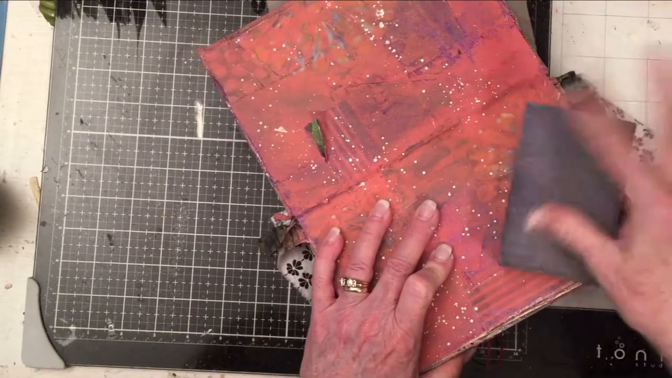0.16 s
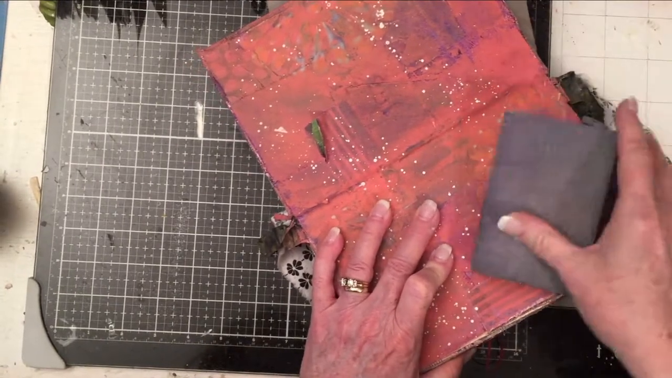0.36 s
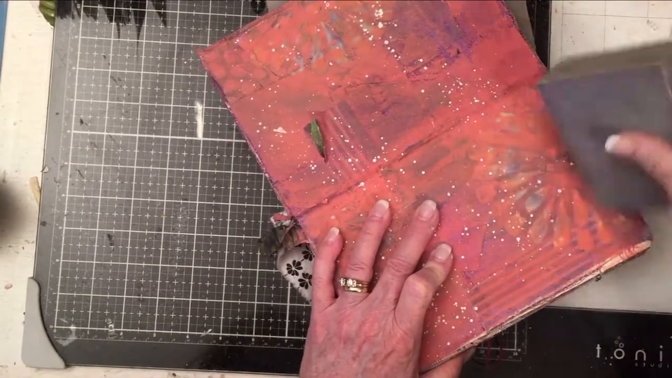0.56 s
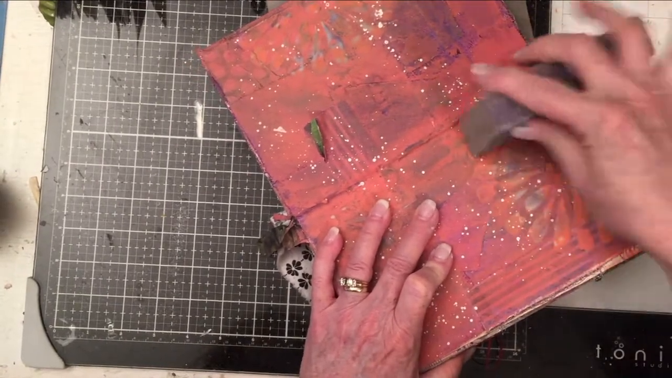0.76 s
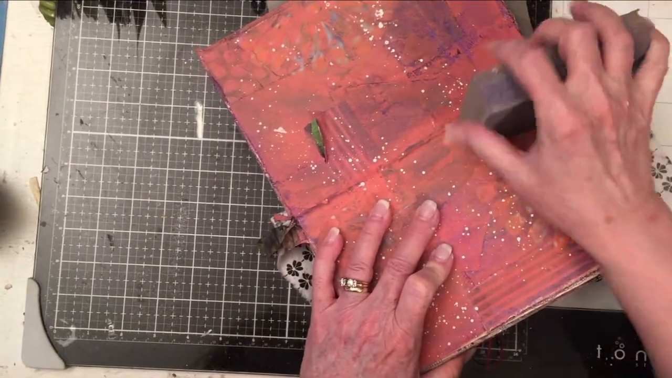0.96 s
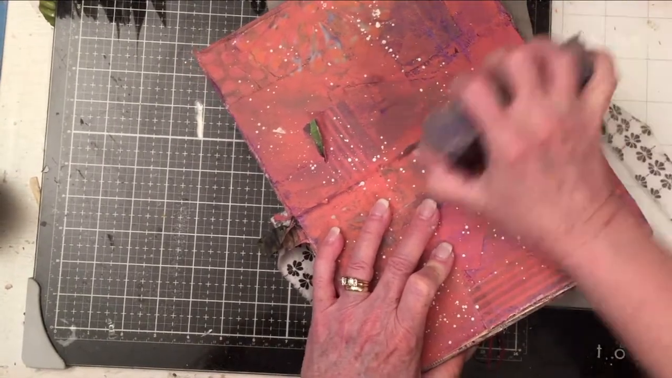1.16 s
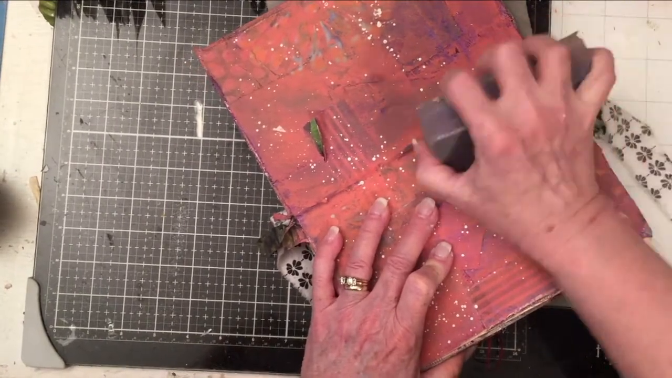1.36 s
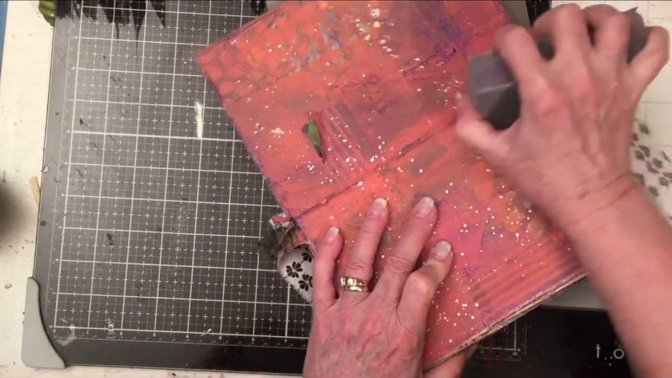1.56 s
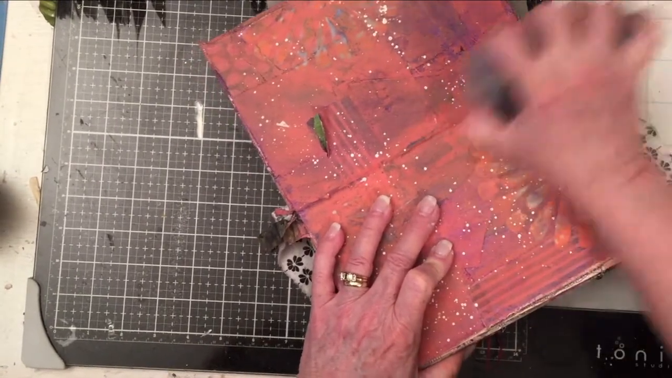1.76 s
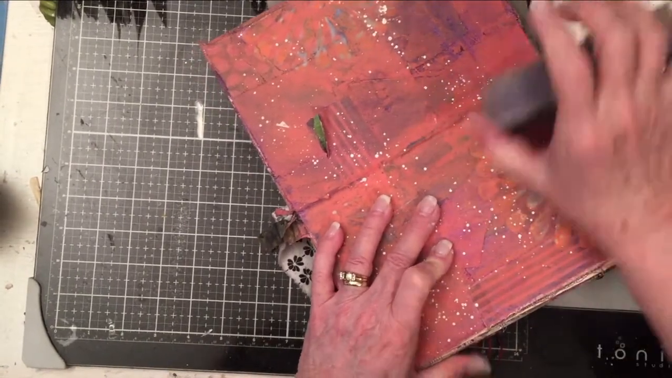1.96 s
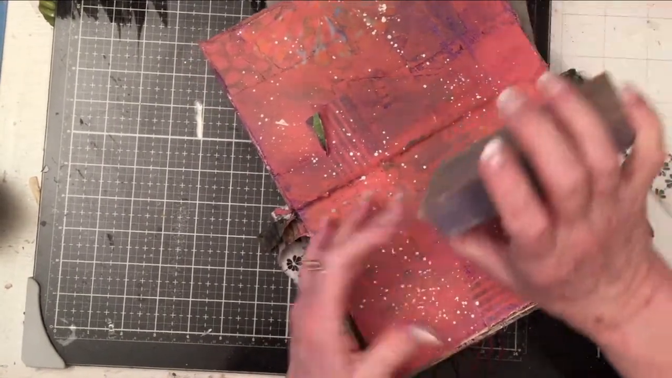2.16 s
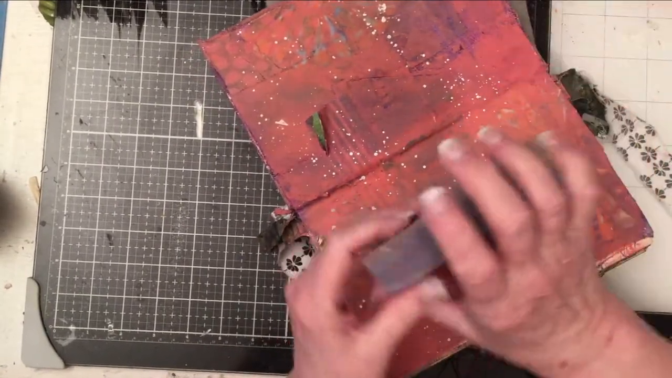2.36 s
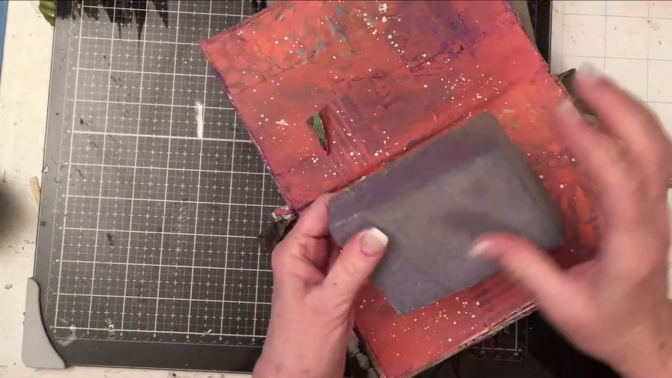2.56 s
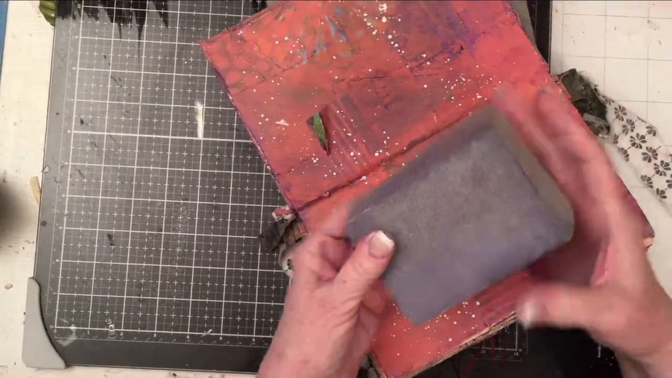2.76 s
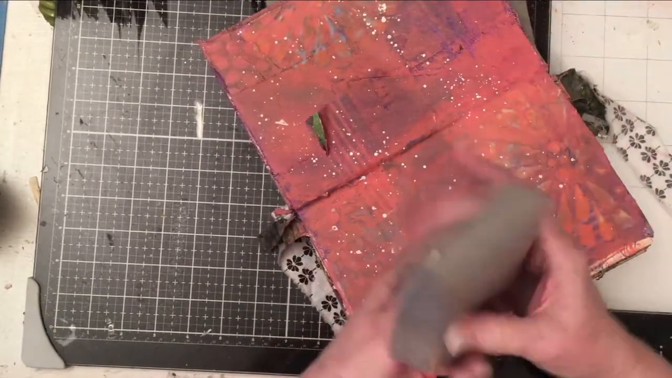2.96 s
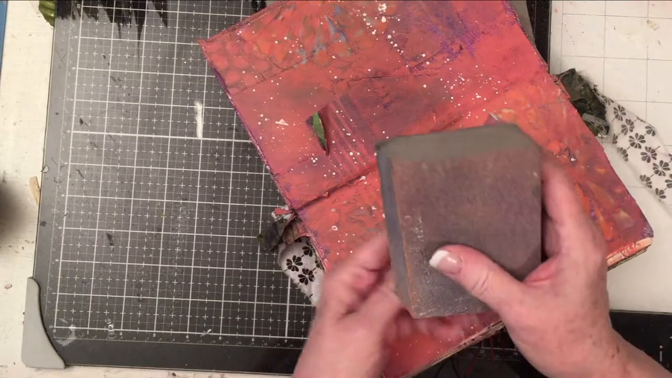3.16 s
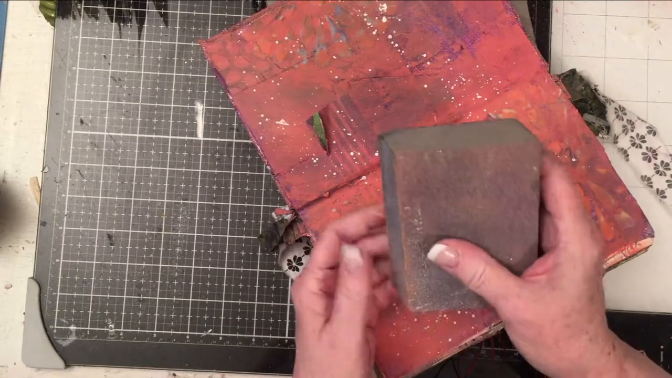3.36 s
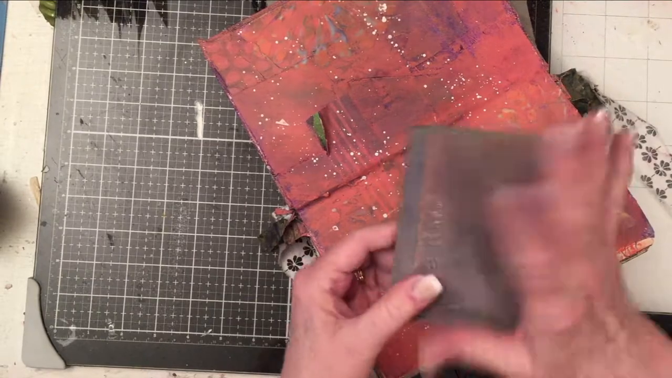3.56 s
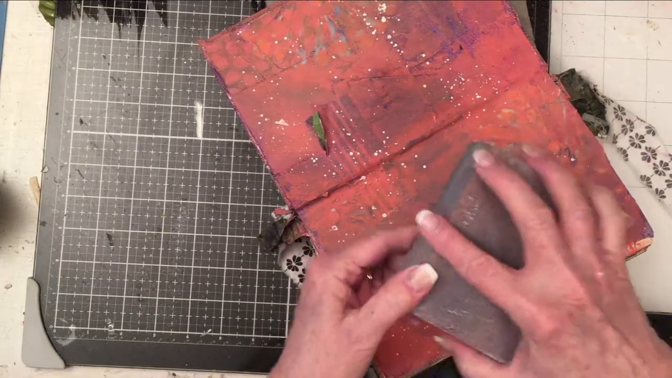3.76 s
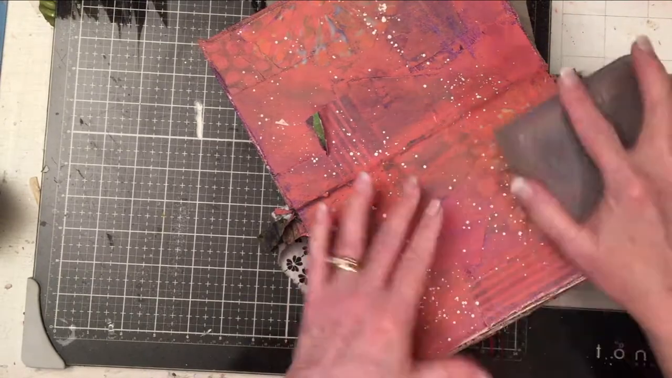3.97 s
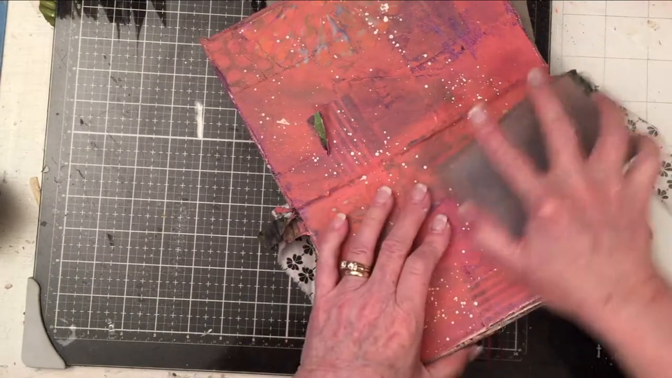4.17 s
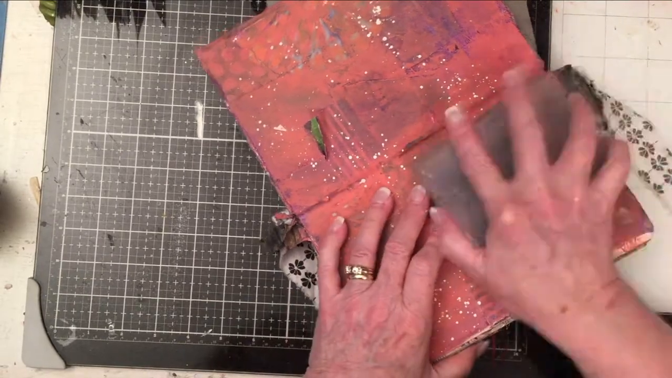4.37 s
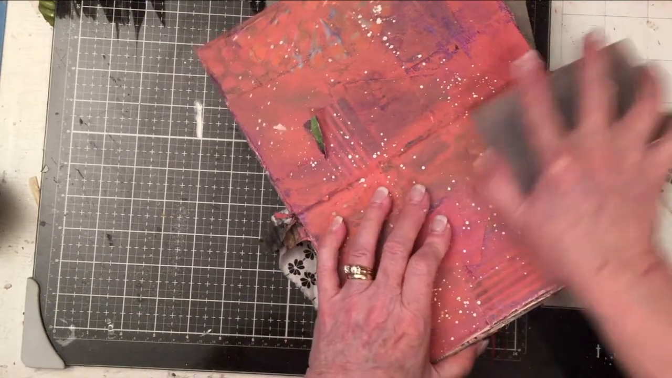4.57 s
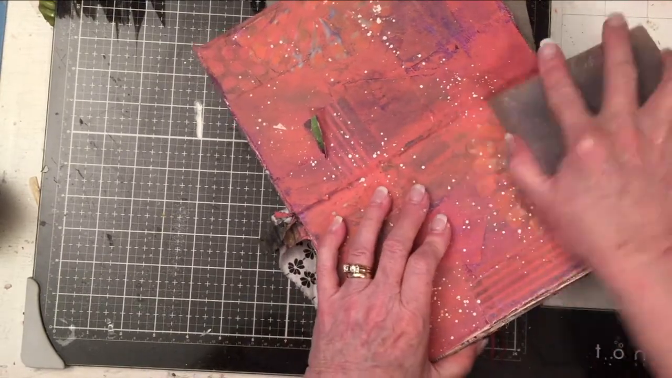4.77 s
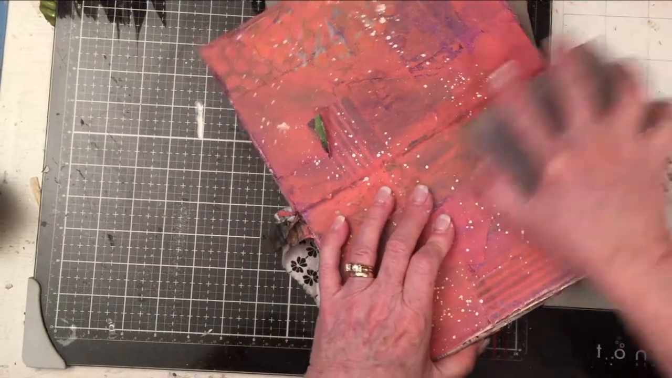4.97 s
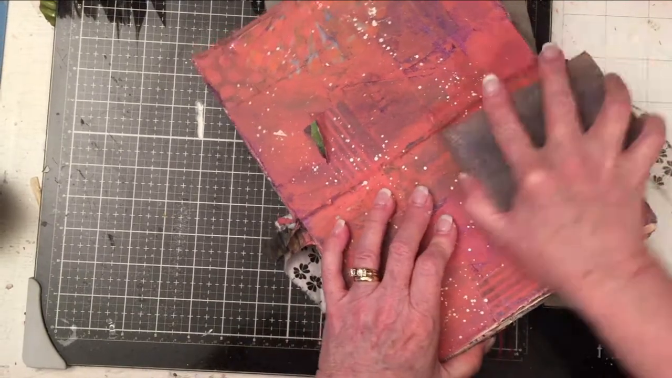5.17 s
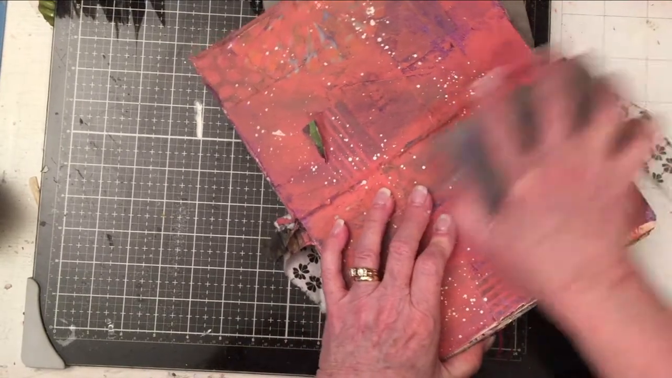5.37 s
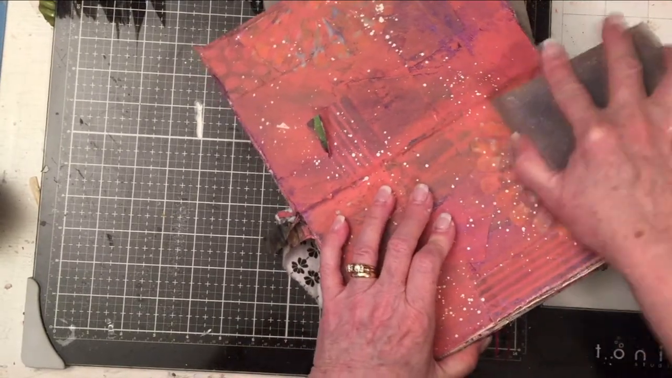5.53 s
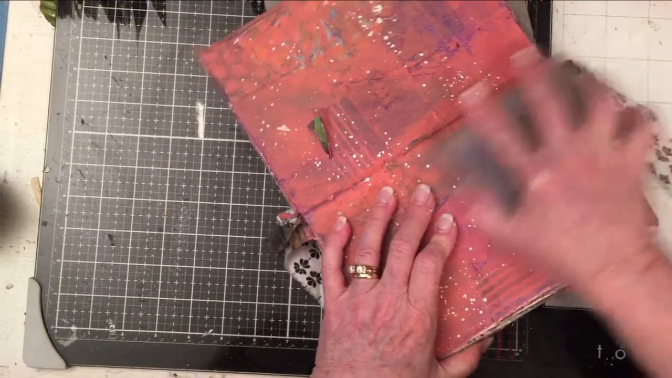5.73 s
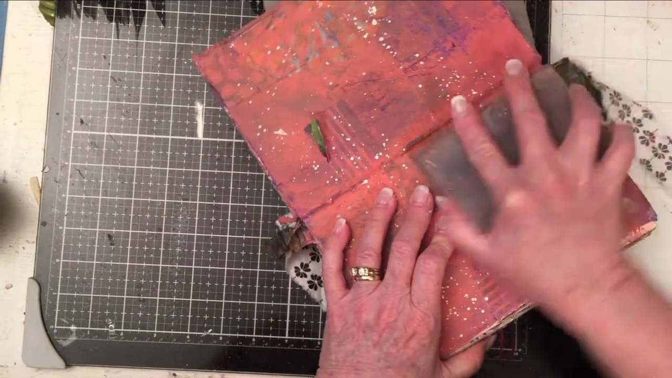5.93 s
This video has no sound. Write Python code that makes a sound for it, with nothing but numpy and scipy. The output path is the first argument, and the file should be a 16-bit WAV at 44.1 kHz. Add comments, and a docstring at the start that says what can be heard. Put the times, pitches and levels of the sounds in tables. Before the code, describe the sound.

Close, dry recording in a small room. A sanding block drags briefly on a painted book page, is handled with taps, then its edge makes short scuffs and harder uneven rasping strokes. After a softer pause of skin brushing on grit and faint knocks, it lands again and scrubs rapidly back and forth until the end, over a low table rumble.

```python
"""On a craft table in a small room, close to one microphone, a sanding block rubs a painted book page.
It is dragged aside; its edge scuffs four times and makes seven strokes; fingers turn it over; then its
flat face scrubs about eight strokes a second. Random snaps of grit, filtered by resonances, form each rub;
irregular trips drum on the page. Decaying modes and noise make the taps; narrow noise makes the table rumble."""
import sys
import numpy as np
from scipy import signal
from scipy.fft import rfft, irfft, next_fast_len
from scipy.io import wavfile
from scipy.ndimage import uniform_filter1d, map_coordinates

SR = 44100
rng = np.random.default_rng(int(sys.argv[2]) if len(sys.argv) > 2 else 0)


def wrap_up_sound(samples):
    """Save the sound to the file named by the first command line argument, as 16-bit audio."""
    columns = np.atleast_2d(samples).T
    # keep every value between -1 and 1, then stretch to whole-number steps
    tamed = np.clip(columns, -1, 1)
    steps = np.round(tamed * 32767).astype(np.int16)
    wavfile.write(sys.argv[1], SR, steps)


N = 264600
TIME = np.arange(N) / SR  # s


def amp(db):
    """Logarithmic level: decibels become an amplitude gain."""
    return 10 ** (np.asarray(db) / 20)


def unit(x):
    """Normalisation: scale a signal to rms 1."""
    return x / np.sqrt(np.mean(x ** 2) + 1e-20)


def along(points, hz):
    """Logarithmic frequency scale: interpolate (f/Hz, value) points along it."""
    f, value = np.transpose(points)
    return np.interp(np.log(hz + 1), np.log(f + 1), value)


def filtered(x, response):
    """Linear filtering: multiply the spectrum by a response of frequency."""
    size = next_fast_len(len(x) + 8192)
    hz = np.fft.rfftfreq(size, 1 / SR)
    return irfft(rfft(x, size) * response(hz), size)[:len(x)]


def below(hz, edge_hz, order=4):
    """Butterworth low-pass: gain falls smoothly above the edge."""
    return 1 / np.sqrt(1 + (hz / edge_hz) ** (2 * order))


def above(hz, edge_hz, order=4):
    """Power complement: the high-pass gain that completes the low-pass."""
    return (hz / edge_hz) ** order * below(hz, edge_hz, order=order)


def resonance(hz, centre_hz, width_hz):
    """Damped resonance: the response of one mode."""
    return 1j * hz * width_hz / (centre_hz ** 2 - hz ** 2 + 1j * hz * width_hz)


# resonances (+) and hollows (-) of block, book and table: (f/Hz, width/Hz, level/dB)
BODY_RESONANCES = [(1054, 82, 4), (1270, 90, 0), (1380, 150, 2.5), (1724, 230, 1.5), (2033, 54, -7),
                   (2045, 90, 4.5), (2260, 530, -1.5), (2580, 260, -1.5), (4950, 910, -3.5), (6030, 260, 0),
                   (6910, 430, -1), (7700, 760, -3.5), (9400, 450, -0.5), (10440, 490, -6.5)]


def body(hz):
    """Resonant colouring: fixed peaks and hollows, summed in decibels, shape every rub."""
    level_db = 0
    for centre, width, db in BODY_RESONANCES:
        level_db = level_db + db / (1 + (2 * (hz - centre) / width) ** 2)
    return amp(level_db)


def wobble(rate):
    """Slow random modulation: a smooth curve through rate knots a second."""
    knots = rng.standard_normal(int(N * rate / SR) + 4)
    return map_coordinates(knots, [TIME * rate])


def snaps(rate, spread_db):
    """Stick-slip: grit points catch and let go as uneven random impulses, rate a second."""
    hit = rng.random(N) < rate / SR
    size = rng.standard_normal(N) * amp(spread_db * rng.standard_normal(N))
    return unit(hit * size)


def smooth_noise(shape, bands, frames):
    """Local averaging: a random time-frequency field, smoothed over bands and frames."""
    across = uniform_filter1d(rng.standard_normal(shape), size=bands, axis=0)
    return unit(uniform_filter1d(across, size=frames, axis=1))


def shifting(x, patchy_db, drift_db):
    """Moving contact patch: colour flickers within a stroke and drifts from one to the next."""
    z = signal.stft(x, nperseg=1024)[2]
    flicker = smooth_noise(z.shape, bands=5, frames=3)
    drift = smooth_noise(z.shape, bands=24, frames=12)
    return signal.istft(z * amp(patchy_db * flicker + drift_db * drift))[1][:N]


HISS_PER_PUSH, CHATTER_PER_RASP = 1.115, 0.92  # dB of hiss per dB of push; dB of chatter per dB of rasp


def stroke_gains(strokes, stop_db_per_s, hiss_per_speed):
    """Friction envelope: each stroke bites, swells to its hardest push, eases off and stops.

    Returns gains of rasp, hiss and any chatter."""
    power = 0
    for start, length, hardest, bite_db_per_s, peak_db, swell_db, hiss_db, *chatter_db in strokes:
        t = TIME - start
        peak_place = np.clip(hardest, .01, .99)
        distance = np.interp(t / length, [0, peak_place, 1], [1, 0, 1])  # 0 at the hardest push
        push = -swell_db * distance ** 2
        speed = -bite_db_per_s * np.maximum(-t, 0) - stop_db_per_s * np.maximum(t - length, 0)
        levels = [push + speed, hiss_db + HISS_PER_PUSH * push + hiss_per_speed * speed]
        levels += [db + CHATTER_PER_RASP * (push + speed) for db in chatter_db]
        power = power + amp(np.maximum(peak_db + np.array(levels), -200)) ** 2
    return np.sqrt(power)


def abrasion(colour, rasp, hiss, weight, rate, spread_db, patchy_db, low_hz, split_hz):
    """Abrasive friction: coarse grit rasps through resonances; fine grit hisses once up to speed."""
    grit = shifting(snaps(rate, spread_db), patchy_db, drift_db=1.68)
    tone = lambda hz: amp(along(colour, hz)) * body(hz)
    coarse = unit(filtered(grit, lambda hz: tone(hz) * below(hz, split_hz, order=6) ** 2))
    fine = unit(filtered(grit, lambda hz: tone(hz) * above(hz, split_hz, order=6) ** 2))
    low = filtered(coarse, lambda hz: below(hz, low_hz, order=3) ** 2)
    high = coarse - low
    return rasp * (low * weight + high / weight) + hiss * fine


def chatter(page, rate, lump_db):
    """Impact excitation: the block trips over ridges of paint and drums on the page."""
    trips = snaps(rate, spread_db=1.5) * amp(lump_db * wobble(110))
    return unit(filtered(trips, lambda hz: amp(along(page, hz))))


def pressure(rasp, drum, light_db, effect):
    """Contact loading: a block that chatters more is pressed harder, so its rasp's low half gains."""
    relative_chatter = drum / rasp / amp(light_db)
    return np.clip(relative_chatter, amp(-9), amp(8)) ** effect


# rasp spectrum of the lightly dragged block, before the body resonances: (f/Hz, level/dB per Hz)
DRAG_SPECTRUM = [(350, -51), (600, -21), (928, -11), (1120, -7.5), (1520, -7), (2350, 2), (2920, -6),
                 (3490, 1), (3780, -2), (7900, -10), (15600, -20)]
# the block dragged aside before it is picked up, levels before the trims below: (start t/s, length t/s,
# place of the hardest push 0-1, bite/(dB/s), peak rasp level/dB, swell/dB, hiss level/dB re rasp)
DRAG_STROKES = [(0.0, 0.071, 0.11, 600, -38, 9, -5.5)]


def drag():
    """Light sliding friction: with little weight on it the block gives a thin rasp."""
    rasp, hiss = stroke_gains(DRAG_STROKES, stop_db_per_s=400, hiss_per_speed=1.4)
    return abrasion(DRAG_SPECTRUM, rasp * amp(-0.1), hiss * amp(0.0), weight=0.83, rate=16000,
                    spread_db=0.5, patchy_db=2.0, low_hz=2200, split_hz=4300)


def jolt_gain(jolts, rise_db_per_s, fall_db_per_s):
    """Exponential growth and decay: the strongest of the (t/s, level/dB) jolts rules each moment."""
    levels = [db - np.maximum(rise_db_per_s * (s - TIME), fall_db_per_s * (TIME - s)) for s, db in jolts]
    return amp(np.max(levels, axis=0))


# hands and block bump the table: (t/s, level/dB)
TABLE_BUMPS = [(0.0, -60), (0.09, -63), (0.225, -46), (0.39, -52), (0.505, -49), (0.585, -48),
               (0.65, -47.5), (0.91, -51), (0.985, -58), (2.31, -66), (3.17, -65), (3.63, -59), (4.01, -58),
               (4.08, -58)]
THUD_RISE_DB_PER_S, THUD_FALL_DB_PER_S = 700, 183
# hard edge strokes rock the table on its legs: (t/s, level/dB)
TABLE_ROCKS = [(1.43, -60), (1.57, -49.5), (1.79, -52), (1.86, -50)]
ROCK_RISE_DB_PER_S, ROCK_FALL_DB_PER_S = 280, 132
# each turn of the hand jolts the table: dB re the stroke's tabled peak, s before the stroke
TURN_JOLT_DB, TURN_LEAD_S = -23.5, 0.018
IDLE_THUD_DB = -75.5  # room rumble keeps the board mode faintly astir


def table():
    """Modal excitation: bumps and hand turns stir the lowest board mode; hard strokes rock the legs."""
    board = lambda hz: resonance(hz, 111.3, 16.0) * below(hz, 440) * above(hz, 48)
    legs = lambda hz: resonance(hz, 56, 30) * below(hz, 62) * above(hz, 37)
    thud = unit(filtered(rng.standard_normal(N), board))
    sway = unit(filtered(rng.standard_normal(N), legs))
    turns = []
    for start, _, _, _, peak_db, *_ in [*EDGE_RUBS, *flat_strokes()]:
        turns.append((start - TURN_LEAD_S, peak_db + TURN_JOLT_DB))
    thud_gain = jolt_gain([*TABLE_BUMPS, *turns], THUD_RISE_DB_PER_S, THUD_FALL_DB_PER_S)
    sway_gain = jolt_gain(TABLE_ROCKS, ROCK_RISE_DB_PER_S, ROCK_FALL_DB_PER_S)
    return (thud_gain + amp(IDLE_THUD_DB)) * thud + (sway_gain + amp(-12) * thud_gain) * sway


# relative spectrum of the room's background noise: (f/Hz, level/dB per Hz)
AIR_SPECTRUM = [(20, -30), (35, -37), (54, 2.5), (80, 0.5), (112, 0.5), (141, -15), (190, -15.5), (300, -9),
                (750, -20.5), (1700, -18.5), (3100, -24.5), (8000, -29.5), (15600, -37.5)]
ROOM_AIR_DB = -64.5  # rms before the slow drift


def room_air():
    """Stationary coloured noise: low rumble and faint hiss, drifting slightly in level."""
    drift = amp(.6 * wobble(7))
    noise = filtered(rng.standard_normal(N), lambda hz: amp(along(AIR_SPECTRUM, hz)))
    return amp(ROOM_AIR_DB) * drift * unit(noise)


# spectrum of skin on grit, before the body resonances: (f/Hz, level/dB per Hz)
FINGER_SPECTRUM = [(300, -15.5), (650, -10), (1100, -8), (1700, 0.5), (2700, 2), (3600, -3.5), (4500, -7),
                   (6000, -11), (8000, -15), (10300, -14), (15600, -16.5)]
# fingers sliding on the block, levels before the trims below: (start t/s, length t/s,
# place of the hardest push 0-1, bite/(dB/s), peak rasp level/dB, swell/dB, hiss level/dB re rasp)
FINGER_RUBS = [(0.205, 0.019, 0.7, 500, -48, 5.5, -3.5), (0.25, 0.013, 0.4, 500, -51.5, 7.5, -13),
               (0.79, 0.023, 0.8, 300, -49.5, 4.5, -7), (0.817, 0.058, 0, 1302, -42.5, 5, 1.5),
               (1.116, 0.025, 0.5, 1040, -56.5, 8, 0.5), (2.178, 0.008, 0.4, 1200, -55, 5, 8.5),
               (2.195, 0.092, 0.3, 500, -58.5, 6, -8), (2.503, 0.047, 0.78, 1240, -51, 2.5, 1),
               (2.608, 0.032, 0.66, 720, -58.5, 4, -3), (2.96, 0.033, 0.6, 300, -62, 6, -4),
               (3.01, 0.031, 0.76, 400, -47, 11, -6.5), (3.093, 0.069, 0.36, 310, -47, 6, -9),
               (3.153, 0.041, 0.67, 850, -43.5, 11, 2.5), (3.198, 0.1, 0.08, 770, -51.5, 10, -3.5),
               (3.607, 0.034, 0.2, 700, -46.5, 9.5, -7), (3.71, 0.057, 0, 300, -57, 6.5, -6),
               (3.95, 0.059, 0.68, 156, -46, 14, -10.5), (4.054, 0.044, 0, 300, -49, 9.5, -8.5)]


def finger_slides():
    """Soft-contact friction: skin brushes over the grit as the block is gripped and turned."""
    rasp, hiss = stroke_gains(FINGER_RUBS, stop_db_per_s=333, hiss_per_speed=1.4)
    weight = amp(0.78 * wobble(18))
    brush = abrasion(FINGER_SPECTRUM, rasp * amp(-1.0), hiss * amp(0.0), weight, rate=8000,
                     spread_db=1.0, patchy_db=3.0, low_hz=2180, split_hz=4970)
    flutter = amp(1.3 * wobble(140))
    return brush * flutter


# modes of the book, before random detuning and level scatter: (f/Hz, level/dB re knock, T60 t/s)
KNOCK_MODES = [(224, -1, 0.044), (490, 3.5, 0.032), (622, 6, 0.039), (823, 3.5, 0.042), (1057, 4, 0.048),
               (1430, -3, 0.017)]
# block and fingers landing on the book, before the soft onset:
# (t/s, slap level/dB, slap centre f/Hz, knock level/dB)
LANDINGS = [(0.218, -29.5, 1640, -40), (0.337, -42, 2470, -58), (0.544, -34, 3400, -50.5),
            (0.584, -28, 2160, -44.5), (0.669, -31, 2750, -46), (1.583, -43, 1500, -51.5),
            (2.119, -43, 1100, -54), (2.145, -53, 2050, -59), (2.195, -38.5, 1960, -56),
            (2.208, -35.5, 2200, -50), (2.238, -47, 1480, -53), (2.302, -41.5, 3160, -62),
            (2.311, -47, 3540, -66), (2.344, -44, 3120, -75), (3.613, -41, 3200, -63),
            (3.776, -58, 1820, -59.5), (4.178, -28, 1690, -42.5), (4.198, -30, 1810, -47)]
TICK_DB = -17  # grit tick, re slap


def book_knock(t):
    """Modal decay: damped sines, scattered anew in pitch, level and sign at each landing."""
    knock = 0
    for hz, level, t60 in KNOCK_MODES:
        decay = amp(level + rng.normal(0, 1) - 60 * t / t60)
        tone = np.sin(2 * np.pi * hz * rng.normal(1, 0.087) * t)
        knock = knock + decay * tone * rng.choice([-1, 1])
    return knock


def taps():
    """Impact: each landing knocks the book's modes, with a papery slap and a tick of grit."""
    out, t = np.zeros(N + SR), np.arange(SR // 5) / SR
    noise = lambda response: unit(filtered(rng.standard_normal(len(t)), response))
    soft = 1 - np.exp(-t / 0.00074)  # foam and flesh cushion the contact
    for s, slap_db, slap_hz, knock_db in LANDINGS:
        knock = book_knock(t)
        slap = noise(lambda hz: resonance(hz, slap_hz, 0.69 * slap_hz) ** 2) * amp(-60 * t / 0.013)
        tick = noise(lambda hz: above(hz, 3400, order=2)) * amp(-60 * t / .016)
        cushioned = soft * (amp(knock_db) * knock + amp(slap_db) * slap)
        out[round(s * SR):][:len(t)] += cushioned + amp(slap_db + TICK_DB) * tick
    return out[:N]


# grit crumbs crackling as the block is set down and lifted: (start t/s, end t/s, rms level/dB)
CRUMB_SPANS = [(0.27, 0.46, -65), (2.03, 2.362, -68)]


def crumbs():
    """Sparse random impulses: loose grit snaps in separate dry ticks."""
    gain = sum(amp(db) * ((TIME > start) & (TIME < end)) for start, end, db in CRUMB_SPANS)
    ticks = snaps(rate=400, spread_db=3)
    tone = lambda hz: amp(along(FINGER_SPECTRUM, hz)) * below(hz, 6700, order=2)
    return gain * unit(filtered(ticks, tone))


# rasp of the narrow edge, before the body resonances: (f/Hz, level/dB per Hz)
EDGE_SPECTRUM = [(450, -47), (700, -14), (880, -13), (1020, -6), (1260, -5), (1700, -1), (2000, -1.5),
                 (2500, -4), (3200, -3.5), (3900, -6), (4850, -15), (6200, -15), (10600, -18), (15600, -22)]
# drumming of the page under the edge: (f/Hz, level/dB per Hz)
EDGE_DRUM_SPECTRUM = [(100, -11), (170, -6.5), (354, -6), (398, -3), (512, -0.5), (863, -6.5), (1010, -7),
                      (1100, -5), (1430, -52), (2420, -120)]
# strokes of the narrow edge, levels before the trims below: (start t/s, length t/s,
# place of the hardest push 0-1, bite/(dB/s), peak rasp level/dB, swell/dB, hiss level/dB re rasp,
# chatter level/dB re rasp)
EDGE_RUBS = [(0.462, 0.035, 0.44, 1010.0, -41, 13.5, -4, -13.5),
             (0.559, 0.082, 0.5, 203, -37, 10.0, -4.5, -14.5),
             (0.644, 0.013, 0.63, 870.0, -39, 12, -1, -13),
             (0.666, 0.022, 0.18, 910.0, -41.0, 6.5, -0.5, -14),
             (0.972, 0.022, 0.58, 920.0, -41.0, 19.5, -6, -9),
             (1.238, 0.061, 0.85, 960.0, -37.5, 6.5, -6, -15.5),
             (1.355, 0.062, 1, 1020.0, -40.0, 1.5, -1.5, -11),
             (1.487, 0.041, 0.2, 1020.0, -36, 1.0, -0.5, -11.5),
             (1.598, 0.073, 0.97, 892, -39.0, 3, -4.5, -13), (1.756, 0.06, 0.6, 1190.0, -37, 1, -5.5, -9.0),
             (1.87, 0.17, 0.33, 550.0, -34.5, 22.0, -5.5, -13.5)]


def edge_scrub():
    """Concentrated contact: the narrow edge bites with fewer, sharper snaps."""
    rasp, hiss, drum = stroke_gains(EDGE_RUBS, stop_db_per_s=709, hiss_per_speed=1.8)
    weight = pressure(rasp, drum, light_db=-18, effect=0.075)
    grind = abrasion(EDGE_SPECTRUM, rasp * amp(-0.77), hiss * amp(1.0), weight, rate=15000,
                     spread_db=1.0, patchy_db=1.3, low_hz=2200, split_hz=4800)
    grip_and_slip = amp(1.3 * wobble(130))
    drumming = chatter(EDGE_DRUM_SPECTRUM, rate=2500, lump_db=1.5)
    return grind * grip_and_slip + drum * amp(0.05) * drumming


# strokes of the flat face, pulled and pushed in turn, levels before the trims in flat_scrub:
# (start t/s, length t/s, peak rasp level/dB, swell/dB, hiss level/dB re rasp)
FLAT_RUBS = [(4.19, 0.048, -46.5, 4.5, -11), (4.248, 0.08, -36, 3, -3.5), (4.387, 0.079, -36.5, 2, -2.5),
             (4.51, 0.075, -28.5, 9.5, -2.5), (4.627, 0.089, -32, 8.5, -2.5), (4.747, 0.088, -34.5, 13, -4),
             (4.882, 0.071, -37.5, 4, -3), (4.984, 0.11, -32.5, 13, -5.5), (5.145, 0.073, -35, 6.5, -3.5),
             (5.249, 0.11, -34, 16.5, -7), (5.416, 0.064, -39.5, 2.5, -3), (5.518, 0.099, -32, 14.5, -2),
             (5.665, 0.08, -33.5, 6, -2.5), (5.784, 0.1, -32, 13, -2), (5.92, 0.1, -34.5, 8.5, -2.5)]
# a pull peaks early, a push leans in until it stops:
# (place of the hardest push 0-1, bite/(dB/s), chatter level/dB re rasp)
PULL, PUSH = (0.26, 327, -14.5), (0.87, 820, -13)


def flat_strokes():
    """Reciprocating motion: pulls and pushes in turn, with the columns of the edge strokes."""
    strokes = []
    for index, (start, length, peak_db, swell_db, hiss_db) in enumerate(FLAT_RUBS):
        hardest, bite_db_per_s, chatter_db = PUSH if index % 2 else PULL
        strokes.append((start, length, hardest, bite_db_per_s, peak_db, swell_db, hiss_db, chatter_db))
    return strokes


# rasp of the flat face, before the body resonances: (f/Hz, level/dB per Hz)
FLAT_SPECTRUM = [(410, -51), (700, -7.5), (829, -11.5), (1030, -3), (1410, -4), (1570, -0.5), (2230, 1),
                 (2780, 2.5), (5110, -6), (6800, -5.5), (7750, -6.5), (8710, -7.5), (10400, -9),
                 (14300, -12.5), (15600, -11.5)]
# drumming of the page under the flat face: (f/Hz, level/dB per Hz)
FLAT_DRUM_SPECTRUM = [(100, -26), (170, -38), (194, -7), (247, -16.5), (313, -7.5), (421, -7.5), (632, 4.5),
                      (830, -8.5), (1100, -4), (1430, -53), (2420, -120)]
SKIM_DB = -57.5  # rasp while the face turns round on the page, before the trim below


def flat_scrub():
    """Distributed contact: many points grind at once, and once begun the face never leaves the page."""
    rasp, hiss, drum = stroke_gains(flat_strokes(), stop_db_per_s=852, hiss_per_speed=1.8)
    skim = amp(SKIM_DB) * (TIME > FLAT_RUBS[0][0])
    rasp = np.hypot(rasp, skim)
    weight = pressure(rasp, drum, light_db=-20.5, effect=0.15)
    grind = abrasion(FLAT_SPECTRUM, rasp * amp(-0.6), hiss * amp(1.04), weight, rate=24000,
                     spread_db=1.5, patchy_db=2.1, low_hz=2360, split_hz=4440)
    grip_and_slip = amp(1.2 * wobble(120))
    drumming = chatter(FLAT_DRUM_SPECTRUM, rate=2000, lump_db=2.0)
    return grind * grip_and_slip + drum * amp(-0.94) * drumming


def nearby(x):
    """Early scattering: things on the table return the sound within 20 ms and comb its colour."""
    t = np.arange(SR // 50) / SR
    echoes = rng.standard_normal(len(t)) * (t > .002) * amp(-60 * t / 0.068)
    return signal.fftconvolve(x, echoes / np.linalg.norm(echoes))[:N]


# reverberation time of the room: (f/Hz, T60 t/s)
REVERBERATION = [(150, 1), (2000, 0.13), (12000, 0.37)]


def room(x):
    """Diffuse reverberation: a noise tail fades fastest in the middle band, slowest in the bass."""
    hz, t, z = signal.stft(rng.standard_normal(SR // 2), SR, nperseg=256)
    t60 = along(REVERBERATION, hz)[:, None]
    tail = signal.istft(z * amp(-60 * t / t60), SR)[1]
    tail = np.pad(tail, (SR // 200, 0))  # 5 ms before the first reflections
    return signal.fftconvolve(x, tail / np.linalg.norm(tail))[:N]


def scene():
    """Superposition: everything adds at one microphone, the same in both channels."""
    work = drag() + finger_slides() + taps() + crumbs() + edge_scrub() + flat_scrub()
    reflections = amp(-17.0) * nearby(work) + amp(-19.5) * room(work)
    mono = work + reflections + table() + room_air()
    return np.array([mono, mono])


TOP_HZ = 15800


def record(dry):
    """Band limiting: the recorder keeps nothing above its top frequency."""
    return np.array([filtered(channel, lambda hz: hz < TOP_HZ) for channel in dry])


dry = scene()
out = record(dry)
wrap_up_sound(out)
```